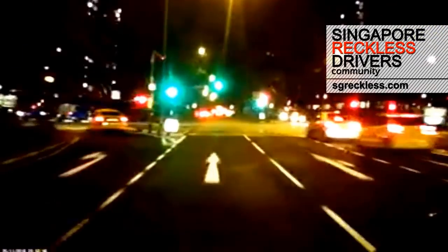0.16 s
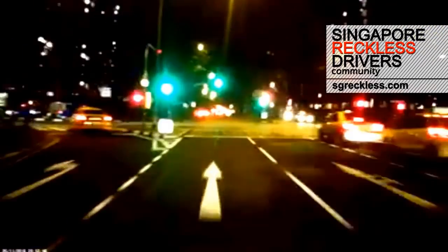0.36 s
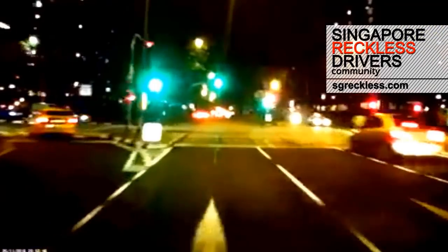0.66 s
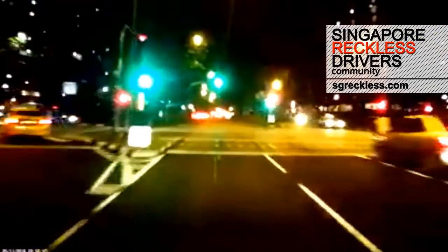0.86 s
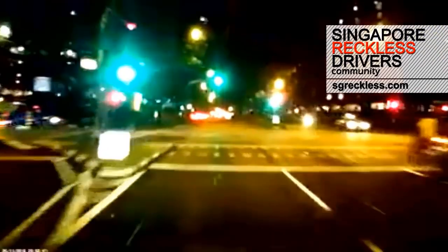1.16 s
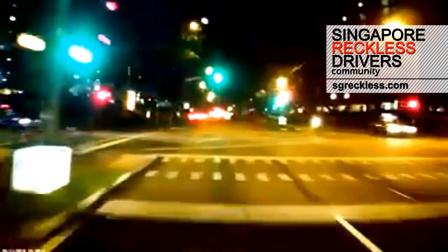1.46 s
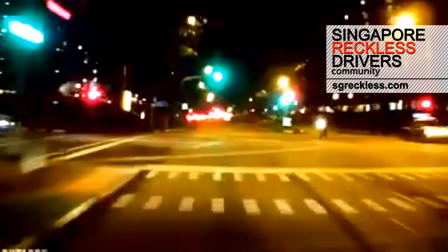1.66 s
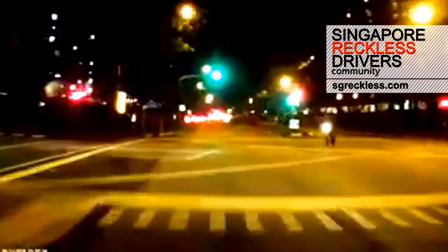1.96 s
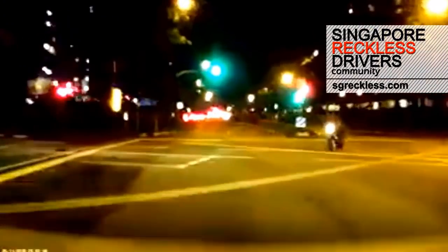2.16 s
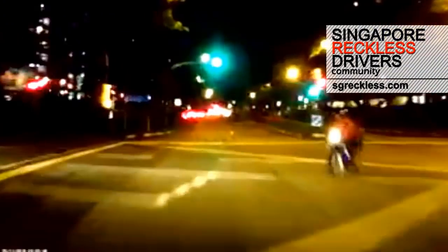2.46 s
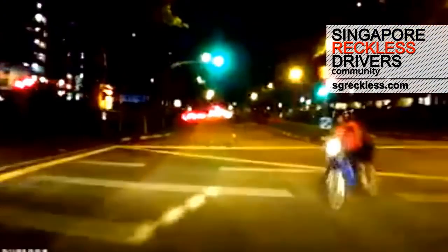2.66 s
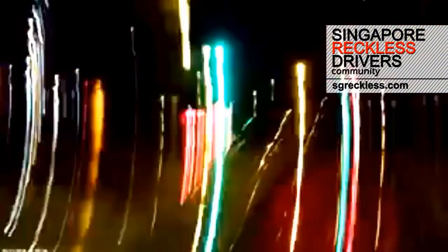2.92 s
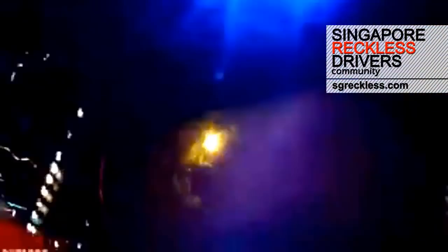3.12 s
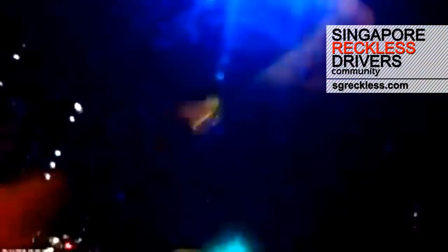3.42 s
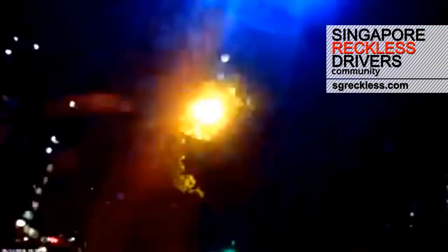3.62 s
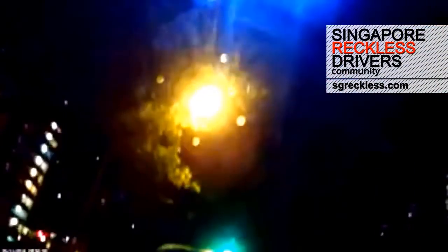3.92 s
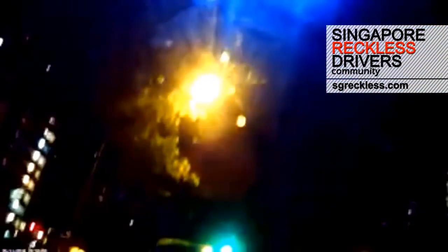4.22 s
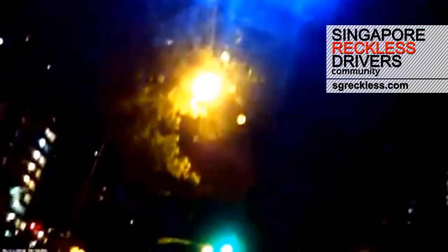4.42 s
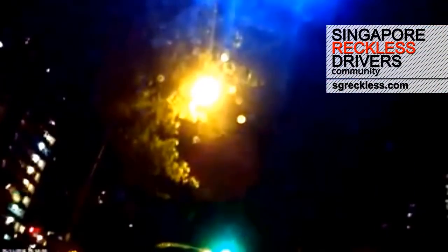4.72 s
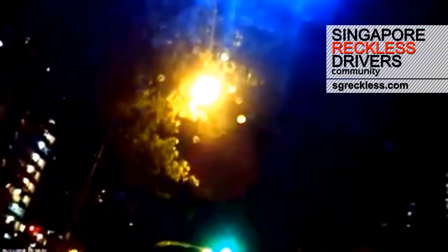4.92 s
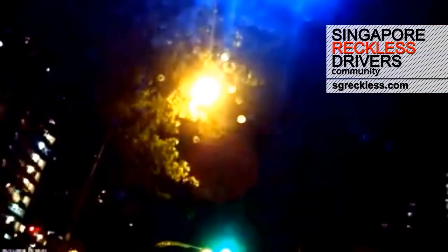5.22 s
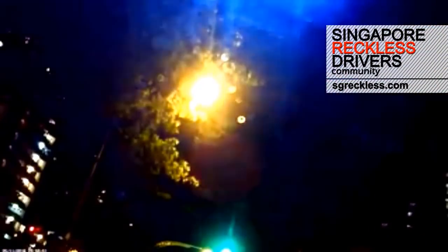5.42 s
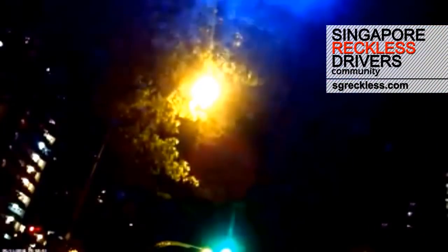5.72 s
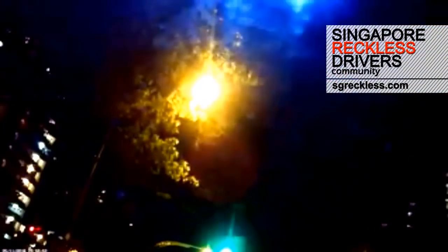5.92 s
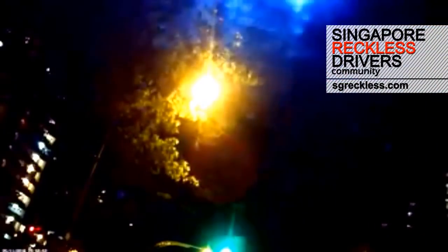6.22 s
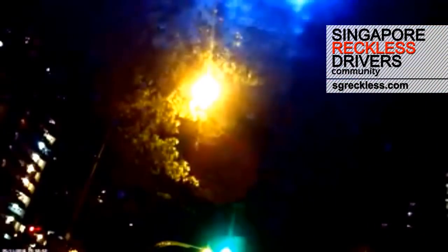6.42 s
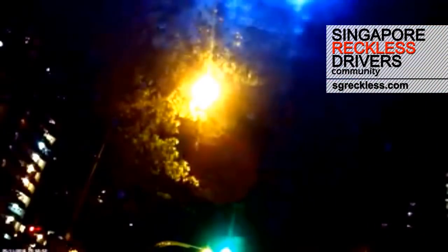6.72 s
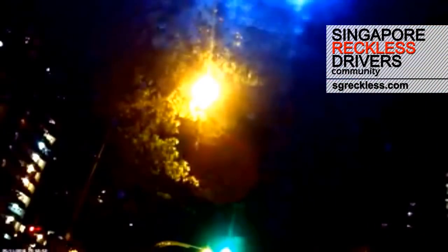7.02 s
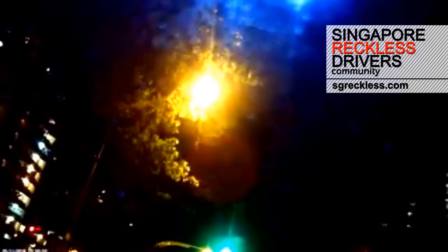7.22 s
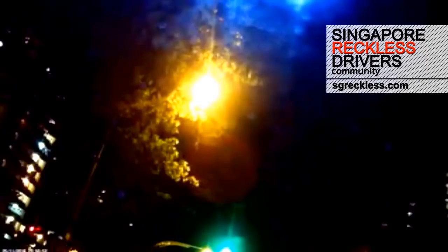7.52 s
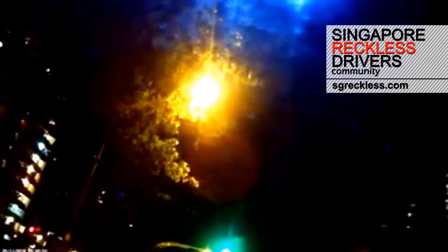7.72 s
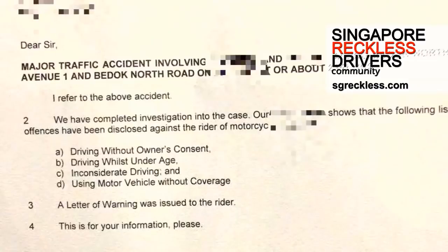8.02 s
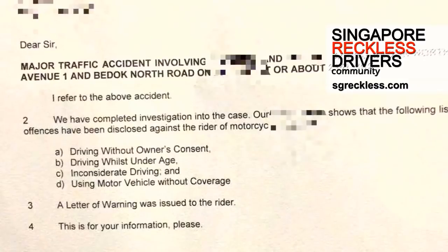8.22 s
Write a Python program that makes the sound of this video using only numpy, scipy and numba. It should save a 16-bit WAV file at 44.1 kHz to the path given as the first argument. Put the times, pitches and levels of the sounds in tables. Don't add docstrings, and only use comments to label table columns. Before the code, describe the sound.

Inside a car at night, a quiet low rumble wavers under faint microphone hiss and a thin high whine. At about three and a half seconds come a thump, short tyre squeals and a weak horn buzz, then a burst of brutal metal blows, glass and clatter overloading the small dashboard microphone. Horn and tyre return briefly; loose parts tick and creak until an abrupt cut to silence.

```python
import sys
import numpy as np
from scipy import signal
from scipy.fft import rfft, irfft, next_fast_len
from scipy.io import wavfile
from scipy.ndimage import uniform_filter1d
from numba import njit

SR = 44100
rng = np.random.default_rng(int(sys.argv[2]) if len(sys.argv) > 2 else 0)


def waveform_to_disk(signal):
    frames = np.transpose(np.atleast_2d(signal))
    scaled = np.clip(frames, -1, 1) * 32767
    samples = np.round(scaled).astype(np.int16)
    wavfile.write(sys.argv[1], SR, samples)


def to_linear_factor(level_db):
    exponent = np.asarray(level_db, float) / 20
    return 10 ** exponent


N = 369116
T = np.arange(N) / SR

# start_s [s], peak_db [dB], pitch_hz [Hz], ring_s [s]
BLOWS = [(0.64, -35, 200, 0.083), (1.342, -29.5, 124, 0.13), (3.6, -16.5, 110, 0.27),
         (3.8, -14.5, 118.7, 0.21), (4.05, -18.5, 166, 0.1), (4.056, -9, 166, 0.1), (4.062, 3, 166.7, 0.1),
         (4.068, 9, 166, 0.09), (4.113, 9, 127, 0.078), (4.157, 1, 44.2, 0.2), (4.192, 9, 84.6, 0.078),
         (4.227, 0, 50, 0.15), (4.333, 3.5, 103.2, 0.15), (4.421, 0, 174, 0.074), (4.68, -4, 121, 0.2),
         (4.774, -6.5, 215, 0.094), (4.916, -9, 111, 0.075), (5.055, -7.5, 128, 0.17),
         (5.14, -5.5, 123.6, 0.14), (5.246, -11, 121, 0.27), (5.326, -13.5, 97.7, 0.24),
         (5.78, -37, 159, 0.13), (5.784, -20, 300, .07), (5.863, -24, 330, .05), (5.885, -20, 280, .06),
         (5.901, -20, 300, .06), (5.934, -25, 264, .06), (5.956, -22, 310, .06), (3.03, -38, 230, .1),
         (3.44, -34, 250, .1), (4.72, -8, 130, .06), (5.955, -29, 140, 0.15), (6.308, -33, 98, 0.12),
         (6.576, -35, 124.1, 0.11), (6.862, -38, 91.7, 0.1), (7.936, -26, 98.4, 0.11),
         (7.945, -21, 82, 0.14), (7.96, -33, 270, .12), (6.6, -40, 200, .08), (6.875, -42, 210, .1),
         (3.93, -18, 250, .1)]
# start_s [s], peak_db [dB], pitch_hz [Hz], clang_db [dB above the knock]
METAL_KNOCKS = [(3.693, -14, 520, -16), (3.805, -25, 517, -8), (3.825, -26, 480, -6),
                (3.893, -25.5, 690, -6), (4.073, -5, 561, -10), (4.088, -10, 700, -8),
                (4.109, 5.5, 479, -13.5), (4.122, -1, 906, -8.5), (4.136, -2.5, 699.7, -10),
                (4.144, -9, 792, -8), (4.165, -11, 935, -8), (4.185, 4, 463, -6.5), (4.202, -4.5, 800, -8),
                (4.213, -6, 806, -8), (4.227, -4, 520, -11.5), (4.33, -3.5, 513, -8.5),
                (4.359, -13, 487, -7), (4.456, -20, 520, -8), (4.493, -23, 452, -1.5),
                (4.595, -17.5, 870, -12.5), (4.654, -19.5, 881, -10), (4.778, -3, 637, -1.5),
                (4.822, -8.5, 630, -3), (4.855, -9.5, 507, -6), (4.884, -14, 600, -7.5),
                (4.9, -15.5, 516, -8), (4.93, -19, 558, -10), (4.975, -22, 895, -16), (5.139, -29, 800, -2)]
# start_s [s], peak_db [dB], pitch_hz [Hz]
TRIM_KNOCKS = [(0.649, -36, 700), (3.59, -26, 690), (4.415, -12, 654), (4.69, -21, 801),
               (4.699, -14.5, 837), (5.676, -30, 500), (5.783, -15, 700), (5.795, -20, 720),
               (5.863, -17, 743), (5.886, -19, 758), (5.9, -17.5, 780), (5.933, -24.5, 690),
               (5.955, -16.5, 739), (5.975, -21.5, 600), (5.997, -23.5, 780), (6.018, -29, 720),
               (6.308, -37.5, 426.5), (6.578, -38, 440), (6.686, -42, 467), (6.865, -39, 420),
               (7.791, -53, 489), (7.854, -47, 450), (7.932, -37, 596)]
# start_s [s], peak_db [dB], bite_hz [Hz], sizzle_db [dB above the bite]
CLACKS = [(3.694, -29.5, 2620, -3.5), (3.7862, -34, 2590, -12), (3.896, -31, 2530, -10),
          (4.076, -14, 1700, -8), (4.105, -16, 2880, -25), (4.119, -16, 2900, -19),
          (4.1345, -9, 2900, -17.5), (4.144, -22, 2000, -18), (4.1615, -17.5, 2590, -13.5),
          (4.1864, 6.5, 3140, -28), (4.201, -11, 2000, -18), (4.212, -14, 3300, -10),
          (4.228, -8.5, 2210, -13), (4.25, -14.5, 3300, -14), (4.2633, -19, 3020, -13),
          (4.3301, -16, 2770, -25), (4.3468, -13.5, 2640, -7), (4.3845, -28, 2520, -5),
          (4.461, -24.5, 2600, -10.5), (4.418, -26, 3500, -14), (4.491, -24.5, 2395, -15.5),
          (4.597, -30, 2420, -21), (4.706, -18, 3700, -15), (4.779, 1, 2600, -16.5), (4.824, -8, 3420, -20),
          (4.8565, -9.5, 3202, -22), (4.884, -14, 3100, -22)]
# start_s [s], peak_db [dB], bite_hz [Hz], sizzle_db [dB above the bite]
TICKS = [(.94, -60, 3000, -8), (1.225, -58, 2600, -8), (6.96, -54, 3600, -20), (5.0527, -38, 2323, -15),
         (5.1403, -41, 2330, -10), (5.1757, -43, 2810, -15), (5.5997, -28, 5030, -5.5),
         (5.7414, -35, 2700, -5), (5.7834, -34.5, 3750, -6.5), (5.862, -40, 2590, -12),
         (5.886, -34, 2715, -9), (5.9565, -34, 2570, -7.5), (6.33, -54, 2600, -2), (6.3869, -49, 2320, -18),
         (6.5872, -49.5, 2940, -8), (6.896, -47, 2870, -14), (7.2562, -50, 2234, -9),
         (7.5987, -53, 3600, -12), (7.6674, -41, 2720, -8), (7.674, -38.5, 4910, -7),
         (7.9009, -40.5, 4840, 0.5), (7.9324, -37.5, 2630, -11)]
# start_s [s], peak_db [dB], pitch_hz [Hz], width_hz [Hz], hold_s [s]
CHATTER = [(4.7778, -4, 2600, 5000, .003), (4.8222, -3, 3500, 2300, .009), (4.8552, -3, 3400, 2300, .011),
           (4.8835, -7, 3200, 2000, .005), (4.79, -13, 2400, 3000, .005), (4.838, -18, 3000, 2500, .006),
           (4.871, -16, 3000, 2500, .007), (4.3305, -9, 2800, 6000, .002), (4.359, -22, 1700, 2000, .002),
           (4.598, -28, 1400, 1600, .001), (4.2125, -13, 4400, 5000, .002), (4.0765, -15, 6000, 3000, .001),
           (7.5987, -46, 3450, 400, .008), (7.6, -50, 5000, 700, .008), (4.779, -9, 1400, 1200, .008),
           (4.823, -15, 1500, 1200, .004), (5.934, -34, 1200, 2400, .002), (5.9545, -33, 1100, 1200, .003),
           (5.782, -30, 1900, 2400, .008), (7.674, -42, 5000, 1800, .004), (4.1345, -17, 2500, 4000, .009),
           (4.159, -16, 1900, 2000, .002), (4.2005, -17, 1800, 2400, .001), (4.2495, -18, 4500, 6000, .004),
           (4.7075, -28, 4200, 4000, .014), (4.1145, -16, 2500, 4000, .001), (5.862, -31, 1000, 1200, .003),
           (5.884, -33, 2500, 1600, .004)]
# start_s [s],
# end_s [s], pitch_hz [Hz], level_db [dB]
SINGING = [(3.8, 4.2, 10314, -64), (3.72, 4.4, 14061, -72), (4.34, 4.56, 15563, -50),
           (3.72, 3.84, 3262, -56), (3.73, 3.8, 4078, -56), (5.0, 5.05, 3205, -55),
           (3.785, 3.87, 2703, -50), (3.94, 3.99, 2400, -50), (5.22, 5.28, 2700, -55),
           (7.22, 7.45, 294, -54), (5.0, 5.45, 4050, -69), (5.04, 5.07, 2370, -47), (5.33, 5.42, 2450, -60),
           (5.7, 5.73, 1650, -52), (5.748, 5.77, 1750, -40), (5.778, 5.79, 1800, -43),
          (5.74, 5.8, 2600, -47), (5.778, 5.795, 3800, -44), (5.884, 5.91, 2650, -47),
          (5.884, 5.9, 3750, -49), (5.95, 5.985, 2620, -50), (5.105, 5.145, 1500, -47),
          (5.175, 5.26, 800, -47), (5.25, 5.28, 2640, -50), (5.21, 5.235, 2760, -55),
          (5.29, 5.31, 2150, -52), (3.9, 3.92, 2500, -46), (3.97, 3.99, 2700, -48), (3.79, 3.83, 2500, -53),
          (3.685, 3.71, 1450, -43), (3.685, 3.71, 880, -34)]
# start_s [s], end_s [s], centre_hz [Hz], level_db [dB]
SPRAYS = [(4.35, 4.56, 13000, -42.5), (4.655, 4.69, 11000, -46), (5.61, 6.05, 10000, -56),
          (4.07, 4.09, 7000, -26), (3.9, 4.06, 6500, -53), (7.94, 8.0, 223, -39), (7.905, 8.0, 5200, -57),
          (7.98, 8.07, 225, -53), (5.86, 6.04, 510, -36.5), (5.73, 5.79, 1700, -45),
          (6.04, 6.55, 11000, -69), (4.89, 5.04, 520, -29), (5.74, 5.83, 4400, -45), (6.82, 6.93, 220, -49),
          (4.23, 4.3, 6500, -33.5), (4.47, 4.51, 2400, -35), (4.66, 4.75, 3200, -40),
          (4.89, 4.95, 3000, -38), (4.04, 4.075, 5500, -44), (3.84, 4.0, 280, -34), (6.1, 6.5, 2500, -70.5),
          (4.797, 4.822, 3300, -27), (7.84, 7.862, 1800, -62), (4.258, 4.285, 9000, -38),
          (6.57, 6.62, 900, -60), (6.86, 6.92, 900, -61), (4.78, 4.9, 1450, -27), (4.64, 4.75, 1400, -40),
          (4.06, 4.076, 6000, -36), (4.126, 4.146, 10000, -36), (.63, .68, 750, -52), (.92, .98, 4000, -70),
          (6.95, 7.3, 2600, -72), (3.56, 3.68, 2800, -68)]
# frequency_hz [Hz], density_db [dB per Hz]
DEBRIS_SPECTRUM = [(880, -39.5), (1500, -9), (1880, -4.5), (4040, -5.5), (6060, -13), (7920, -15.5),
                   (14600, -22), (16000, -26.5)]
# start_s [s], end_s [s], depth_db [dB]
LULLS = [(4.09, 4.101, -7), (4.147, 4.158, -14), (4.179, 4.186, -8), (4.195, 4.2, -10), (4.202, 4.21, -10),
         (4.216, 4.227, -5), (4.318, 4.33, -12), (4.334, 4.345, -10), (4.079, 4.09, -4), (6.04, 6.12, -3),
         (4.69, 4.706, -2), (4.75, 4.777, -7), (4.764, 4.777, -12), (4.797, 4.822, -6), (4.845, 4.855, -4)]
# start_s [s], end_s [s], pitch_hz [Hz], level_db [dB], roughness [0-1]
SQUEAL = [(3.752, 3.805, 1100, -44, .3), (3.795, 3.84, 1127, -37.5, .5), (3.8, 3.84, 1380, -40, .5),
          (3.855, 3.907, 1042, -36, .35), (3.888, 3.94, 1236, -30, 0.42), (3.895, 3.93, 1086, -34, .5),
          (3.945, 3.99, 1125, -38, 0.47), (3.995, 4.062, 1074, -39, 0.45), (5.042, 5.07, 1179, -24.5, 0.27),
          (5.066, 5.101, 1151, -32, .4), (5.1, 5.125, 1180, -42, 0.41), (5.185, 5.238, 1185, -42, .35),
          (5.209, 5.365, 1172, -34, 0.32), (3.79, 4.05, 1166, -44.5, 0.9), (5.34, 5.475, 1203, -40.5, .3),
          (5.205, 5.26, 1336, -46, .5), (5.247, 5.325, 1335, -37, 0.37)]
# start_s [s], end_s [s], pitch_hz [Hz], level_db [dB]
HORN = [
    (3.717, 3.898, 410, -39.5),
    (3.882, 4.064, 410, -43),
    (4.96, 5.3, 401, -43.5),
    (5.27, 5.74, 401, -39.5),
]
# multiple [of the pitch], level_db [dB]
HORN_ORDERS = [(1, -1.5), (2, -15), (3, -29.5), (10, -26)]
# centre_hz [Hz], width_hz [Hz], level_db [dB]
AIR_MODES = [(35.68, 23, 0), (56.5, 21, -8)]
# time_s [s], pitch_hz [Hz]
BOOM_HZ = [(0, 43.91), (4.2, 45.06), (4.8, 39.1), (5.2, 42.08), (5.5, 32.3), (6.4, 33.9), (7.3, 32.18),
           (7.7, 27.92)]
# time_s [s], pitch_hz [Hz]
HEAVE_HZ = [(3.5, 27), (4.0, 20.2), (4.5, 28), (4.9, 16), (5.4, 22.8)]
# centre_hz [Hz], width_hz [Hz], level_db [dB]
FLOOR_MODES = [(104.4, 40, 1), (150, 55, -2), (228.5, 110, -5)]
# centre_hz [Hz], width_hz [Hz], level_db [dB]
TRIM_MODES = [(290, 74, 2), (420, 170, -3), (484, 89, -6.5), (693, 430, -4.5), (899, 24, -15),
              (914, 270, -12), (1345, 440, -22), (2600, 1900, -26)]
# time_s [s], level_db [dB]
ROCK = [(0, -23), (.27, -30), (.6, -25.5), (1.7, -25.5), (3.15, -25), (3.3, -19), (3.52, -25.5),
        (4.03, -16), (4.1, -7), (4.4, -10.5), (4.6, -17.5), (4.93, -10.5), (5.8, -15), (5.95, -27),
        (6.5, -34.5), (7.05, -35.5), (7.5, -44.5), (8.05, -49.5)]
# time_s [s], level_db [dB]
GRIND = [(0, -51), (3.55, -51.5), (3.73, -46), (3.84, -38.5), (4.08, -32.5), (4.24, -16.5), (4.32, -23),
         (4.57, -35.5), (4.8, -30.5), (4.93, -27.5), (5.0, -38), (5.18, -39), (5.62, -43), (5.83, -37),
         (6.08, -56), (6.9, -60.5), (7.93, -64.5), (8.04, -81)]
# frequency_hz [Hz], density_db [dB per Hz]
HISS_SPECTRUM = [(710, -39), (1200, -12.5), (2090, -15.5), (6650, -18), (8000, -9.5), (8440, -18),
                 (14700, -26), (16000, -35)]

TOUCH_S, BRAKE_S, STOP_S, CUT_S = 3.58, 5.5, 6.1, 8.068
SHATTER_S, SETTLE_S, SETTLE_DB = 3.69, 4.9, -3.5


def level(x):
    return x / np.sqrt(np.mean(x ** 2))


@njit
def svf(x, hz, width):
    y, b, l = np.empty(len(x)), 0., 0.
    for i in range(len(x)):
        g, k = np.tan(np.pi * hz[i] / SR), width / hz[i]
        v = (b + g * (x[i] - l)) / (1 + g * (g + k))
        b, l, y[i] = 2 * v - b, l + 2 * g * v, k * v
    return y


def band(x, hz, width):
    centre = np.broadcast_to(1. * hz, len(x)).copy()
    return svf(svf(x, centre, 1. * width), centre, 1. * width)


def noise_band(length, hz, width):
    return level(band(rng.standard_normal(length), hz, width))


def walk(rate):
    k = int(SR / rate)
    held = np.repeat(rng.standard_normal(N // k + 1), k)
    return 1.1 * uniform_filter1d(uniform_filter1d(held, k), k)[:N]


def coloured(x, spectrum):
    hz, db = np.transpose(spectrum)
    size = next_fast_len(N)
    log_hz = np.log(np.arange(1, size // 2 + 2) * SR / size)
    gain = to_linear_factor(np.interp(log_hz, np.log(hz), db))
    return level(irfft(rfft(x, size) * gain, size)[:N])


def curve(points):
    return np.interp(T, *np.transpose(points))


def edges(t, start, end, edge_s):
    return np.clip(np.minimum(t - start, end - t) / edge_s, 0, 1)


def fall(t, rise, ring):
    return np.minimum(t / rise, 1) * np.exp(-np.log(1000) * t / max(ring, .01))


def add(out, s, x):
    i = int(s * SR)
    out[i:i + len(x)] += x[:N - i]


def blows():
    out, t = np.zeros(N), T[:SR // 3]
    for s, db, hz, ring in BLOWS:
        shell = np.sin(2 * np.pi * hz * t) + 0.71 * np.sin(2 * np.pi * 1.37 * hz * t)
        add(out, s - .003, to_linear_factor(db - 1.0) * fall(t, 0.0032, ring) * shell)
    return out


def knocks():
    out, t = np.zeros(N), T[:SR // 3]
    metal = [k + (0.095,) for k in METAL_KNOCKS]
    trim = [k + (-25, 0.085) for k in TRIM_KNOCKS]
    for s, db, hz, clang_db, ring in metal + trim:
        chance = rng.standard_normal((2, 4))
        ratio = np.array([.48, .66, .86, 1]) * (1 + .03 * chance[0])
        size = to_linear_factor(np.array([-2.0, -4.0, -9.5, -1.5]) + 1.7 * chance[1])
        modes = size @ np.sin(2 * np.pi * hz * np.outer(ratio, t))
        rubbing = band(rng.standard_normal(len(t)), .8 * hz, .9 * hz)
        scuff = 0.83 * level(band(rubbing, .8 * hz, .9 * hz))
        clang = to_linear_factor(clang_db + 0.5) * noise_band(len(t), 1100, 1100)
        hit = (modes + scuff) * fall(t, 0.0028, ring) + clang * fall(t, .002, 0.9 * ring)
        add(out, s - .001, to_linear_factor(db - 5.5) * hit)
    return out


def clacks():
    out, t = np.zeros(N), T[:SR // 3]
    events = [c + (0.057,) for c in CLACKS] + [c + (0.14,) for c in TICKS]
    for s, db, hz, sizzle_db, ring in events:
        broad, bright, grain, dull, narrow = rng.standard_normal(size=(5, len(t)))
        crackle = to_linear_factor(15.0 * uniform_filter1d(grain, size=40))
        core = level(band(narrow, hz, 500) + 0.28 * band(narrow, 1.3 * hz, 500))
        core = core * fall(t, 0.0016, 0.76 * ring)
        bite = level(band(band(broad, hz, 1.9 * hz), hz, 1.9 * hz))
        bite = bite * crackle * fall(t, .055 * ring, ring)
        sizzle = level(svf(bright, 8000 + 0 * t, 9000.))
        sizzle = sizzle * crackle * fall(t, .06 * ring, 1.2 * ring)
        tail = level(band(dull, .7 * hz, 3000.0)) * fall(t, 0.0076, 0.17)
        clack = bite + 0.7 * core + to_linear_factor(sizzle_db + 5.0) * sizzle + to_linear_factor(-17.5) * tail
        add(out, s - .001, to_linear_factor(db - 8.0) * clack)
    return out


def chatter():
    out, t = np.zeros(N), T[:SR // 8]
    for s, db, hz, width, hold in CHATTER:
        buzz, grain, snap = rng.standard_normal(size=(3, len(t)))
        sag = to_linear_factor(-5 * np.minimum(t / hold, 1))
        shape = sag * fall(np.maximum(t - hold, 0) + .001, .001, 0.039)
        body = to_linear_factor(12 * uniform_filter1d(grain, size=50)) * shape * level(band(buzz, hz, width))
        snap = to_linear_factor(-7) * level(svf(snap, hz + 0 * t, 1.6 * width)) * fall(t, .0003, .012)
        onset = np.minimum(t * 3000, 1)
        add(out, s, to_linear_factor(db - 3) * onset * (body + snap))
    return out


def singing():
    out = np.zeros(N)
    thin = [r + (min(0.037 * r[2], 380 ** 2 / r[2]),) for r in SINGING]
    wide = [r + (.7 * r[2],) for r in SPRAYS]
    for start, end, hz, db, width in thin + wide:
        t = T[:int((end - start) * SR)]
        gain = to_linear_factor(db - 4 * t / t[-1]) * edges(t, 0, t[-1], 0.0068)
        add(out, start, gain * noise_band(len(t), hz, width))
    return out


def debris():
    db = -21.5 + 0.76 * curve(GRIND) + SETTLE_DB * (T > SETTLE_S)
    size = to_linear_factor(db) * (T > SHATTER_S)
    excess = np.sqrt(np.maximum(size ** 2 - to_linear_factor(-70) ** 2, 0))
    grit = rng.standard_normal(N) * to_linear_factor(2.6 * walk(90) + 0.98 * walk(25))
    return to_linear_factor(3.5) * excess * coloured(grit, DEBRIS_SPECTRUM)


def lulls():
    db = 0
    for start, end, depth_db in LULLS:
        sink = (T - start) / .004
        impact = (end - T) * 2000
        db = db + depth_db * np.clip(np.minimum(sink, impact), 0, 1)
    return to_linear_factor(db)


def squeal():
    out = np.zeros(N)
    waver = 0.014 * walk(70) + 0.008 * walk(12)
    flutter = to_linear_factor(3.3 * walk(41))
    for start, end, start_hz, db, rough in SQUEAL:
        t, i = T[:int((end - start) * SR)], int(start * SR)
        now = slice(i, i + len(t))
        hz = start_hz + 100 * t
        phase = 2 * np.pi * np.cumsum(hz * (1 + waver[now])) / SR
        noise = rng.standard_normal(size=(2, SR // 2))[:, :len(t)]
        scrape = level(band(noise[0], hz, 200)) + .15 * level(band(noise[1], 2.1 * hz, 500))
        clean = np.sqrt(2) * (np.sin(phase) + .05 * np.sin(2 * phase))
        gain = edges(t, 0, t[-1], 0.011) * to_linear_factor(db - 5 * t / t[-1])
        add(out, start, gain * flutter[now] * ((1 - rough) * clean + rough * scrape))
    return out


def horn():
    out = 0
    for start, end, hz, level_db in HORN:
        phase = 2 * np.pi * np.cumsum(hz * (1 + .002 * walk(33))) / SR
        tone = sum(to_linear_factor(db + 4.5 + 2.0 * walk(15)) * np.sin(k * phase) for k, db in HORN_ORDERS)
        out = out + to_linear_factor(level_db) * edges(T, start, end, 0.018) * tone
    return out


def jolts():
    power = np.zeros(N)
    for s, db, hz, _ in BLOWS:
        if hz < 225:
            add(power, s, (to_linear_factor(-12 + .6 * db) * fall(T[:SR], .03, 0.69)) ** 2)
    return power


def shaken(modes, flicker_db, rate):
    total = 0
    for hz, width, db in modes:
        total = total + to_linear_factor(db + flicker_db * walk(rate)) * noise_band(N, hz, width)
    return level(total)


def car():
    rock, grind = to_linear_factor(curve(ROCK)), to_linear_factor(curve(GRIND))
    phase = 2 * np.pi * np.cumsum(curve(BOOM_HZ) * (1 + 0.05 * walk(9))) / SR
    air = np.sqrt(2) * to_linear_factor(3.2 * walk(7.4)) * np.sin(phase) + 0.57 * shaken(AIR_MODES, 1.7, 13)
    parked_db = np.interp(T, [BRAKE_S, STOP_S], [0, -36])
    heave = rock * to_linear_factor(-5 + parked_db + 2.6 * walk(5))
    springs = noise_band(N, curve(HEAVE_HZ), 13)
    moving = (T > TOUCH_S) * (T < STOP_S)
    shudder = np.sqrt((to_linear_factor(8) * grind) ** 2 + jolts() * moving)
    floor = shudder * shaken(FLOOR_MODES, 2.5, 16)
    trim = to_linear_factor(1.5) * grind * shaken(TRIM_MODES, 2.8, 18)
    return to_linear_factor(-2.5) * rock * air + heave * springs + floor + trim


def camera():
    flip = np.tanh(6 * np.sin(np.pi * 59.94 * T))
    whine_hz = 7862
    whine = np.sqrt(2) * to_linear_factor(-61 + .6 * walk(3.3)) * flip * np.sin(2 * np.pi * whine_hz * T)
    hiss = coloured(rng.standard_normal(N) * to_linear_factor(1.3 * walk(20)), HISS_SPECTRUM)
    return whine + to_linear_factor(-66) * hiss


def scene():
    tones = knocks() + blows() + horn() + squeal()
    clatter = debris() + clacks() + singing() + chatter() + camera()
    return (car() + tones + lulls() * clatter)[None]


def top_cut(x):
    return signal.sosfilt(signal.butter(12, 16390, fs=SR, output="sos"), x)


def record(dry):
    hot = 1.118 * dry
    flat = .94 * hot / (1 + np.abs(hot) ** 6) ** (1 / 6)
    treble = signal.sosfilt(signal.butter(4, 1500, "high", fs=SR, output="sos"), hot)
    flat = flat + to_linear_factor(-5) * np.abs(flat) ** 6 * np.clip(treble, -.1, .1)
    coupled = signal.sosfilt(signal.butter(1, 8, "high", fs=SR, output="sos"), flat)
    top = signal.ellip(8, .2, 80, 15620, fs=SR, output="sos")
    until_cut = np.clip((CUT_S - T) / 0.0068, 0, 1)
    return top_cut(signal.sosfilt(top, coupled) * until_cut)


dry = scene()
out = record(dry)
waveform_to_disk(out)
```